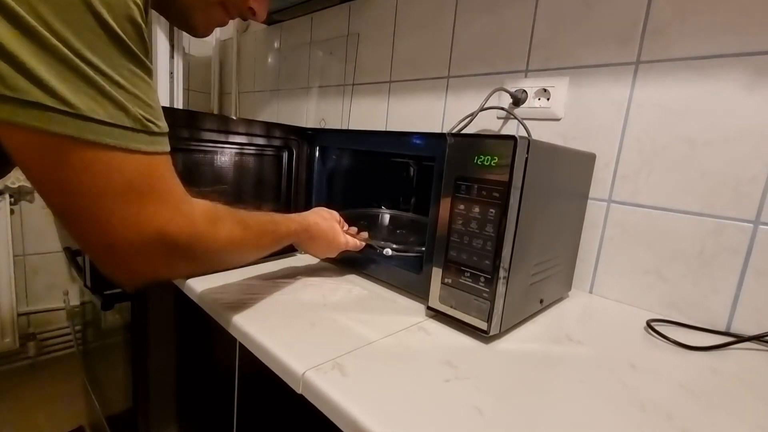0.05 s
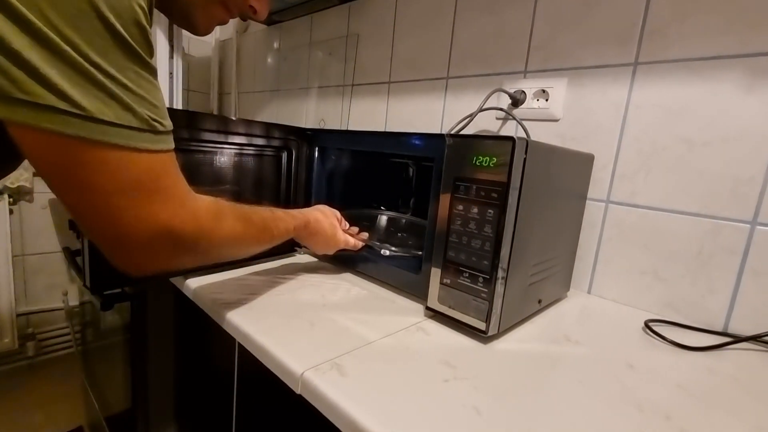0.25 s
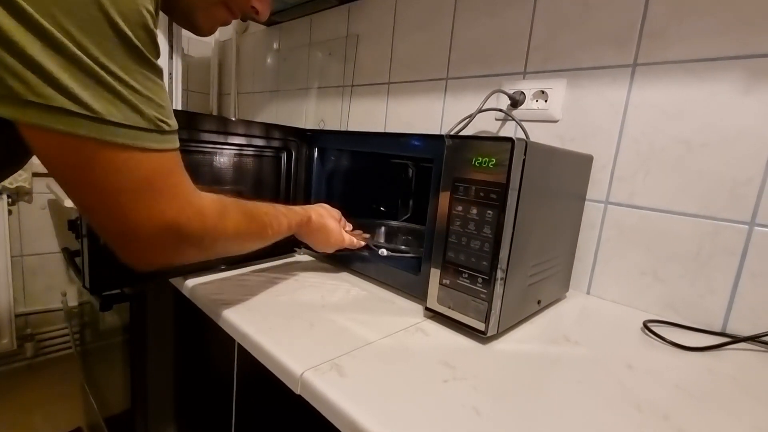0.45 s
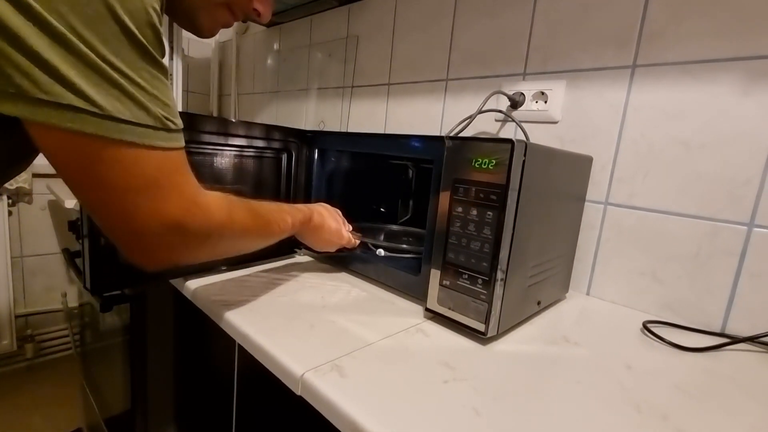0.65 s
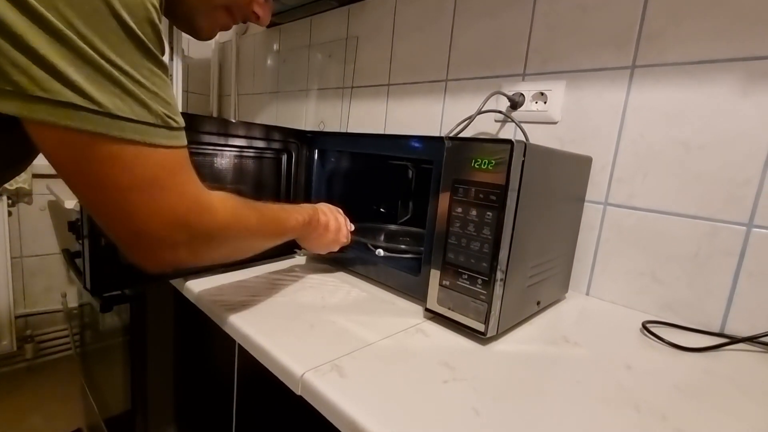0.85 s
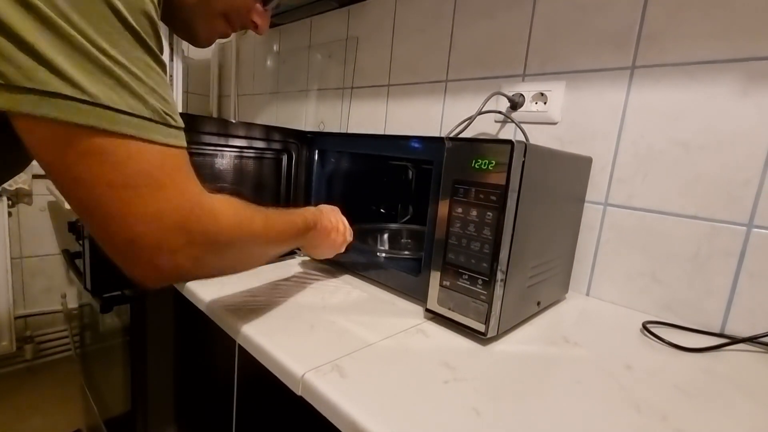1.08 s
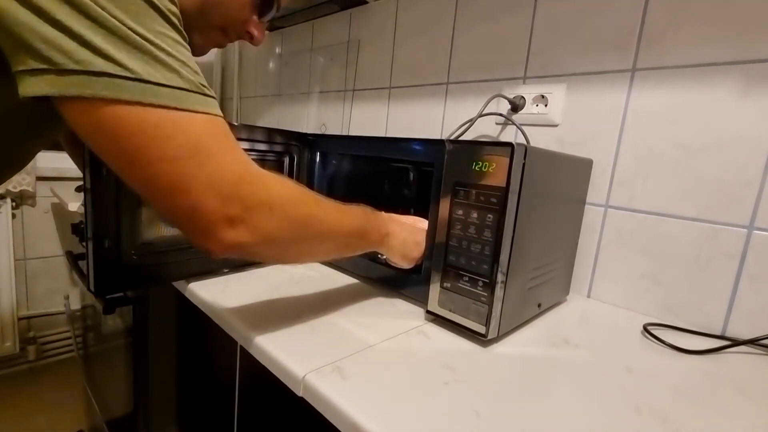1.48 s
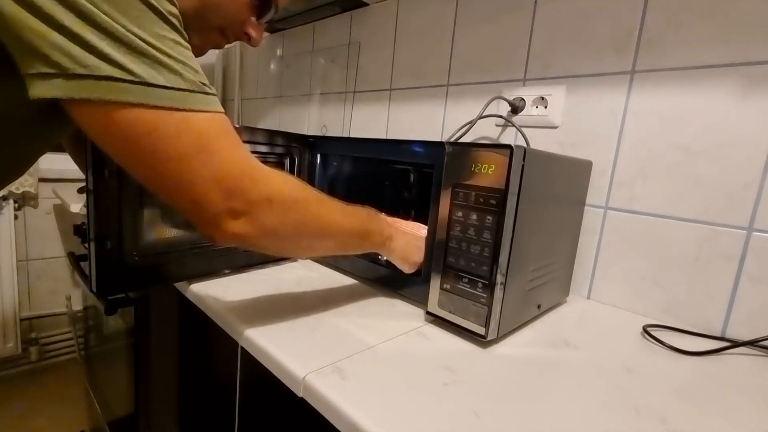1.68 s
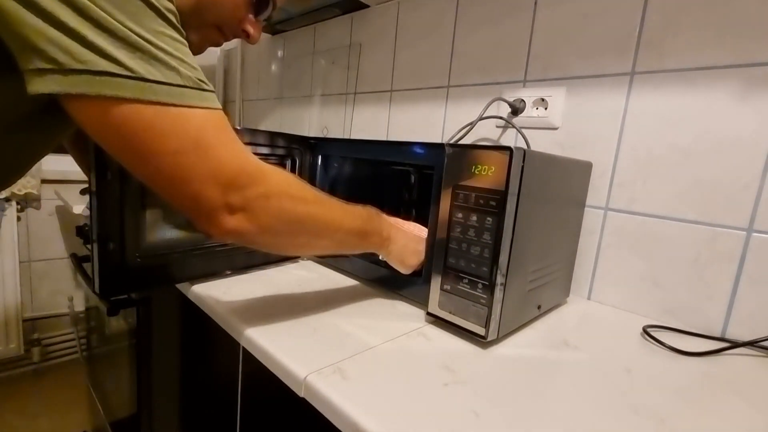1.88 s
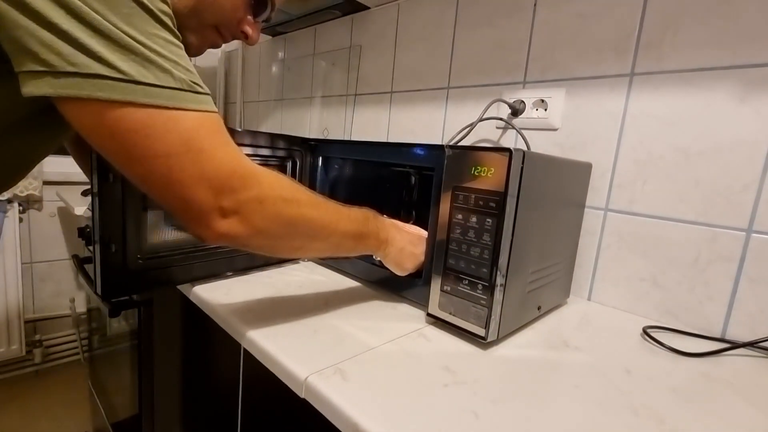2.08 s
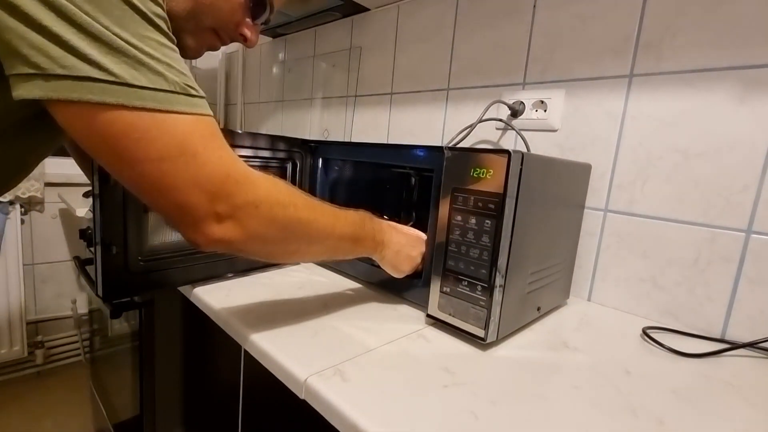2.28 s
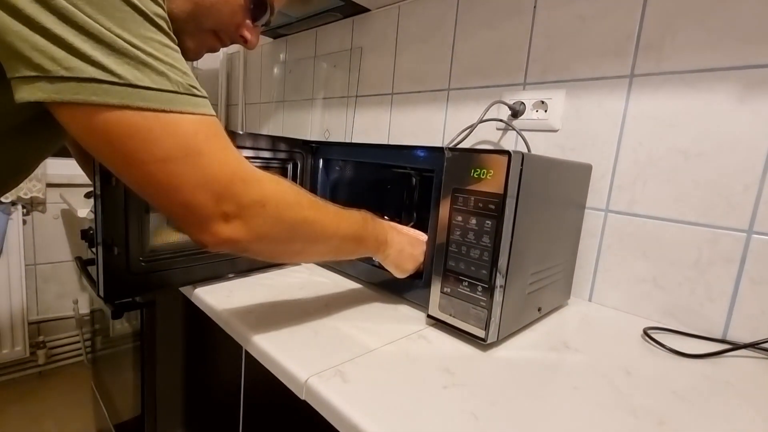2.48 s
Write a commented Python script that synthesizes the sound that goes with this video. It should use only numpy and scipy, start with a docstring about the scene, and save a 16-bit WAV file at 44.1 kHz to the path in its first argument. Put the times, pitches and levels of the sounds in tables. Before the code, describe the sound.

A glass turntable plate knocks inside an open microwave at 0.2 seconds, ringing the metal panels. A short scrape leads into flurries of sharp, ringing clatter from 0.5 to 1.1 seconds, with a faint boom near 0.9. More knocks come between 1.4 and 1.8. After a scrape, the plate drops with a hollow boom just past 2 seconds. Lighter knocks and a last scrape follow, over low kitchen room noise.

```python
"""A hand shifts and seats the glass turntable plate in an open microwave oven in a quiet tiled kitchen.
A first knock fills the sheet-metal cavity and the room with dense clatter and rings the cabinet panels.
Short scrapes over the oven floor and flurries of knocks follow; where struck freely, the glass rings too.
The floor booms as the plate drops on it, faintly near 0.9 s and hardest just after 2 s.
A few more knocks, one soft boom and a last scrape seat the plate, over steady low room noise."""
import sys
import numpy as np
from scipy import signal
from scipy.fft import rfft, irfft
from scipy.io import wavfile

SR = 44100
rng = np.random.default_rng(int(sys.argv[2]) if len(sys.argv) > 2 else 0)


def transcribe(u):
    """Save the signal u as a 16-bit wav file named by the first command-line argument.

    u: samples, shape (n,) or (channels, n), limited to [-1, 1]; the rate is SR.
    q: integer samples, one column per channel.
    """
    v = np.clip(np.atleast_2d(u).T, -1, 1)
    q = np.round(v * 32767).astype(np.int16)
    wavfile.write(sys.argv[1], SR, q)


N = 116865
T = np.arange(SR) / SR  # each contact sounds for one second
BIN_HZ = np.fft.rfftfreq(SR, 1 / SR)


def oven(shared, parts_db, snap_db, panel_hz):
    """One contact excites the oven: a snap, dense reflections that die band by band, and ringing panels."""
    # centres of thud, body, clang, crack and tick: centre_hz
    parts_hz = [100, 400, 1150, 3500, 11000]
    # dense response of cavity and room: frequency_hz, level_db
    clatter_curve = [(25, -88), (45, -69.5), (65, -50.5), (140, -58), (280, -51), (560, -50), (1200, -51.5),
                     (2000, -57), (3300, -51), (4500, -56), (6000, -62), (7200, -64.5), (8500, -75),
                     (10000, -74), (13000, -70), (15200, -80), (16500, -95)]
    # how each band builds and dies: centre_hz, t60_s, rise_s
    decay = [(59.7, 0.61, 0.0069), (158, 0.76, 0.0065), (445, 0.57, 0.0056), (1140, 0.48, 0.00053),
             (2850, 0.37, 0.0027), (6750, 0.26, 0.0015), (13740, 0.29, 0.00089)]
    # modes of the sheet-metal panels and cavity: pitch_hz, level_db, t60_s
    cabinet = [(75.3, -39, 0.99), (117.73, -31.5, 0.63), (240.8, -27.5, 0.53), (281.3, -30, 0.71),
               (383.4, -36.5, 0.57), (410, -44.5, 1), (442.8, -35, 0.46), (498, -30.5, 0.67),
               (544, -42.5, 0.59), (660, -34.5, 0.78), (764, -25.5, 0.29), (881, -40.5, 0.34),
               (982, -35.5, 0.73), (1106, -31, 0.39), (1179, -28, 0.33), (1419, -27, 0.33),
               (1645, -31.5, 0.19)]
    snap_s, shared_power, focus_db = 0.0068, 0.41, 12
    reflections, ripple_db = shared
    colour = list(zip(parts_hz, parts_db))
    clatter = np.sqrt(shared_power) * reflections + np.sqrt(1 - shared_power) * noise(SR)
    clatter *= amp(read(clatter_curve, BIN_HZ) + read(colour, BIN_HZ) + ripple_db)
    snap = amp(snap_db) * np.exp(-T / snap_s)
    centres_hz = [row[0] for row in decay]
    out = np.zeros((2, SR))
    for solo, (_, t60_s, rise_s) in zip(np.eye(len(decay)), decay):
        band = irfft(clatter * read(list(zip(centres_hz, solo)), BIN_HZ), SR)
        out += band * (1 - np.exp(-T / rise_s)) * (amp(-60 * T / t60_s) + snap)
    for hz, db, t60_s in cabinet:
        level_db = db + read(colour, hz) + focus_db * favour(hz, panel_hz)
        out += mode(hz, level_db, t60_s, rise_s=read(decay, hz, column=2))
    return out


def cavity():
    """What all contacts share: one pattern of reflections, and the ripple of countless metal resonances."""
    width_hz, treble_depth_db = 26, 3.6
    bell = np.exp(-.5 * (np.arange(-200, 201) / width_hz * 2) ** 2)
    ripple = np.convolve(rng.standard_normal(len(BIN_HZ)), bell / np.linalg.norm(bell), "same")
    depth_db = treble_depth_db * BIN_HZ / (BIN_HZ + 1200)  # smoother in the bass
    ripple_db = depth_db * np.minimum(ripple, 2) - depth_db ** 2 / 10
    return noise(SR), ripple_db


def plate(ring_db, focus_hz):
    """The glass rings, the point of contact favouring some modes; echoes off walls and tiles waver it."""
    # modes of the glass plate: pitch_hz, level_db, t60_s
    glass = [(1537, -42, .3), (1943, -49, .9), (2555, -46, .55), (2955, -39, .38), (3797, -31, .27),
             (4198, -32, .28), (4288, -39, .22), (5218, -43, .23), (5545, -44, .24), (5990, -39, .2),
             (6818, -44, .22), (7020, -41, .25), (7848, -44, .25), (8621, -47, .25), (9790, -52, .2),
             (10327, -46, .24), (10481, -50, .2), (12142, -45, .2), (12512, -46, .22), (13300, -52, .2),
             (14060, -46, .18), (14281, -51, .15)]
    focus_db, echo_db, echo_t60_s = 8, -4, .25
    ring = sum(mode(hz, ring_db + db + focus_db * favour(hz, focus_hz), t60_s, rise_s=.002)
               for hz, db, t60_s in glass)
    walls = rng.standard_normal((2, SR)) * amp(-60 * T / echo_t60_s)
    echo = signal.fftconvolve(ring, walls / np.linalg.norm(walls[0]), axes=1)[:, :SR]
    return ring + amp(echo_db) * echo


def floor_boom(level_db):
    """The oven floor booms on one low mode when the plate drops on it."""
    return mode(189, level_db, t60_s=0.53, rise_s=0.0062)


def scrape(shared, length_s, parts_db):
    """Many tiny slips of glass on metal excite the oven, easing off slightly along the stroke."""
    # tone of one slip: frequency_hz, level_db
    slip_curve = [(100, -6), (800, 3), (2200, 1), (3200, -1), (4500, -4.5), (7000, -5), (12000, -3.5)]
    slips_per_s, slip_db, spread_db, ease_db = 500, -15, 2, 2.5
    slipping = (rng.random(SR) < slips_per_s / SR) & (T < length_s)
    force = amp(slip_db + spread_db * rng.standard_normal(SR) - ease_db * T / length_s)
    slips = slipping * force * rng.choice([-1, 1], SR)
    grain_spectrum = amp(read(slip_curve, np.fft.rfftfreq(128, 1 / SR)))
    grain = np.roll(irfft(grain_spectrum), 64)
    friction = np.convolve(slips, grain, "same")
    response = oven(shared, parts_db, snap_db=3.5, panel_hz=1377)
    return signal.fftconvolve(response, friction[None], axes=1)[:, :SR]


def kitchen():
    """Steady, low room tone."""
    # spectrum of the quiet kitchen: frequency_hz, relative_db
    air_curve = [(15, -39), (25, -19), (80, -4.5), (127, -23), (223, -14.5), (344, -20), (405, -6),
                 (451, -18.5), (962, -17.5), (1040, -15.5), (1740, -28), (3160, -29.5), (16000, -56.5)]
    level_db = -52
    air = irfft(noise(N) * amp(read(air_curve, np.fft.rfftfreq(N, 1 / SR))), N)
    return amp(level_db) * air / air.std()


def mode(hz, level_db, t60_s, rise_s):
    """One dying resonance, reaching left and right in different phases."""
    likeness, gains = stereo_image(hz)
    phase = rng.uniform(0, 2 * np.pi) + np.array([[0], [np.arccos(likeness) * rng.choice([-1, 1])]])
    envelope = amp(level_db - 60 * T / t60_s) * (1 - np.exp(-T / rise_s))
    return gains[:, None] * envelope * np.sin(2 * np.pi * hz * T + phase)


def favour(hz, focus_hz, width_octaves=0.077):
    """How near a mode lies to the narrow range that a point of contact favours, 0-1."""
    return np.exp(-.5 * (np.log2(hz / focus_hz) / width_octaves) ** 2)


def noise(size):
    """Spectrum of white noise, spread and panned by the stereo image."""
    left, other = rfft(rng.standard_normal((2, size))) * np.sqrt(SR / 2)
    likeness, gains = stereo_image(np.fft.rfftfreq(size, 1 / SR))
    right = likeness * left + np.sqrt(1 - likeness ** 2) * other
    return gains * np.array([left, right])


def stereo_image(hz):
    """Left-right likeness and the two channel gains at each frequency."""
    # width and balance: frequency_hz, correlation, left_minus_right_db
    image = [(60, 0.96, 1), (180, 0.89, -4), (346, 0.023, 0.5), (756, -0.15, -1.5), (1460, -0.33, -2),
             (2840, -0.048, -1.5), (4200, -0.27, -5), (5970, 0.049, 1), (9000, -0.22, 2.5),
             (14000, .1, -6.5)]
    lean_db = read(image, hz, column=2) / 2
    return np.clip(read(image, hz), -1, 1), amp([lean_db, -lean_db])


def amp(db):
    """Decibels to gain."""
    return 10 ** (np.asarray(db) / 20)


def read(points, hz, column=1):
    """One column of a table, interpolated along log frequency."""
    table = np.transpose(points)
    return np.interp(np.log(hz + 1), np.log(table[0] + 1), table[column])


def add(mix, start_s, sound):
    """Mixes a stereo sound in at its start time."""
    part = mix[:, round(start_s * SR):][:, :sound.shape[1]]
    part += sound[:, :part.shape[1]]


def scene():
    """Knocks, booms and scrapes over the room tone."""
    # the plate knocks against the oven: start_s, thud_db, body_db, clang_db, crack_db, tick_db,
    # snap_db, ring_db, favoured_glass_hz, favoured_panel_hz
    knocks = [ (.2085, -2.5, -3.5, -3, -3.5, -24, -47, -35, 3830, 686),
              (0.4826, 0.5, -20, -12.5, -23.5, -35, 10.5, -20, 3800, 1230),
              (0.5425, 2, -2, 7.5, -2, -6.5, 5, 0, 2960, 1264),
              (.562, -1, 0.5, -2, -6, -14.5, -9, -19, 3000, 880),
              (0.6206, -9, -9.5, -1, -15.5, -24.5, 8, -18, 3000, 1210),
              (0.8437, -3.5, -5, 3, -3.5, 0, -5.5, 1, 6970, 1696),
              (.861, -1.5, -4.5, -3.5, 2.5, -17, -19, -14, 3020, 795),
              (.976, -12.5, -13.5, -14, -16.5, -40, -14, -18, 1600, 1613),
              (1.014, -3, -22.5, -14, -14, -12, 0.5, -1, 5720, 1700),
              (1.085, -7, -12, -19, -25, -56, 2, -15, 3900, 537),
              (1.421, -17, -33, -43, -37, -46, -3, -28.5, 4200, 786),
              (1.451, -8.5, -18, -23.5, -15, -19, -10, -4, 4250, 1114),
              (1.622, -18, -25, -23, -21, -25, -14, -33, 7000, 1220),
              (1.650, -6, -7.5, 1.5, -11.5, -12, 3.5, -25, 3800, 1050),
              (1.654, 1.5, 3, -11.5, -0.5, -7, 3.5, 4, 14300, 408),
              (1.700, -20, -9, -22, -28, -32, -13, -32, 3780, 410),
              (1.755, -7.5, -11.5, -5.5, -17.5, -14, -22, -12.5, 7100, 1050),
              (2.051, 0, -3, -4, -2, -10, 4.5, -11, 3080, 535),
              (2.272, -14, -45, -44, -37, -30.5, -14, -31, 6840, 278),
              (2.3227, -1.5, -14, -13, -12, -7, -14, -18, 4240, 555),
              (2.510, -18, -26, -36, -38, -27.5, -14, -34, 7000, 270)]
    # the plate drops on the oven floor: start_s, level_db
    booms = [(0.863, -27.5), (2.058, -16.5), (2.33, -27)]
    # the plate slides: start_s, length_s, thud_db, body_db, clang_db, crack_db, tick_db
    scrapes = [(0.38, 0.14, -2.5, -15, -18.5, -14.5, -35), (0.71, 0.064, -28, -25, -43, -23.5, -14),
               (1.925, .014, 2, -4, -21.5, -12, -11.5), (1.956, .09, -9, -10.5, -23, -19.5, -24.5),
               (2.574, .075, -11.5, -21, -34.5, -28, -35.5)]
    shared, mix = cavity(), kitchen()
    for start_s, *parts_db, snap_db, ring_db, glass_hz, panel_hz in knocks:
        add(mix, start_s, oven(shared, parts_db, snap_db, panel_hz) + plate(ring_db, glass_hz))
    for start_s, level_db in booms:
        add(mix, start_s, floor_boom(level_db))
    for start_s, length_s, *parts_db in scrapes:
        add(mix, start_s, scrape(shared, length_s, parts_db))
    return mix


def record(dry):
    """A steep low-pass trims the top end at 16 kHz."""
    low_pass = signal.firwin(255, 16000, window=("kaiser", 9), fs=SR)
    return signal.oaconvolve(dry, low_pass[None], "same")


dry = scene()
out = record(dry)
transcribe(out)
```